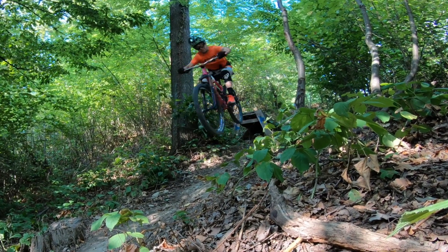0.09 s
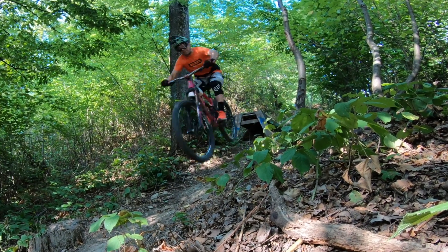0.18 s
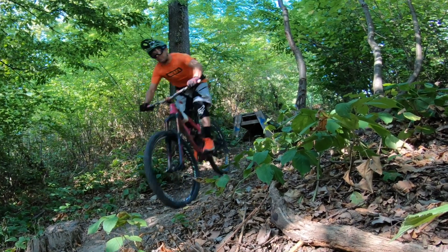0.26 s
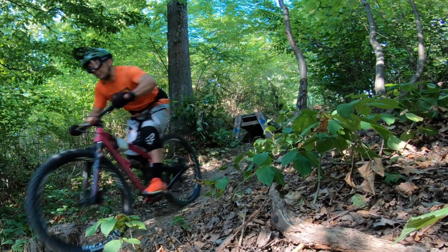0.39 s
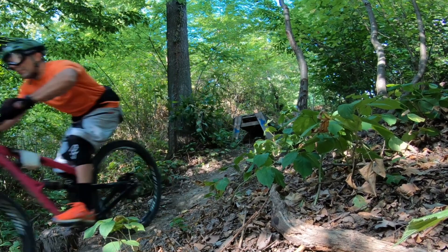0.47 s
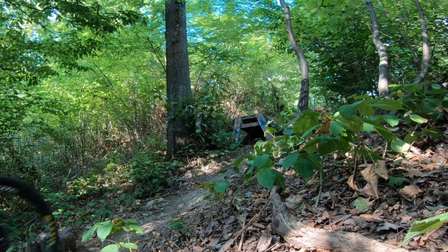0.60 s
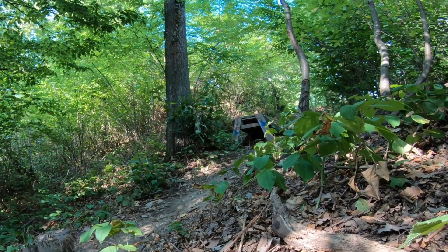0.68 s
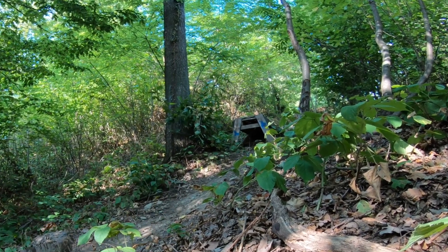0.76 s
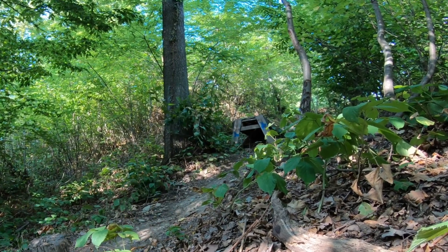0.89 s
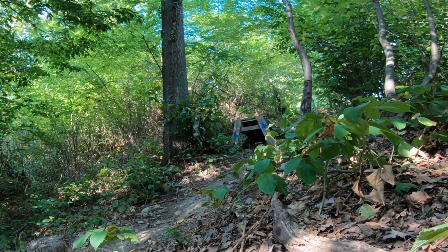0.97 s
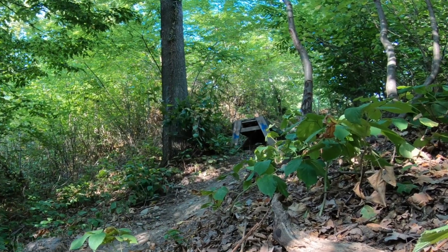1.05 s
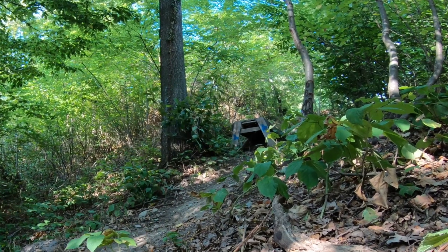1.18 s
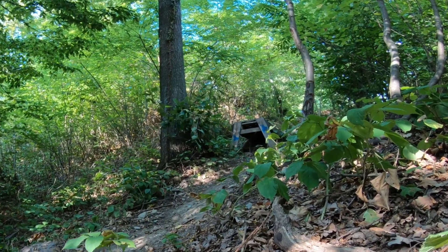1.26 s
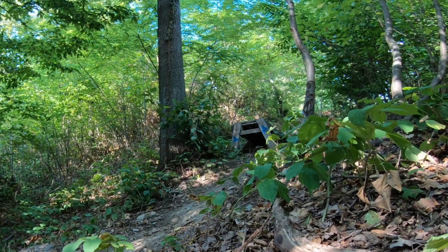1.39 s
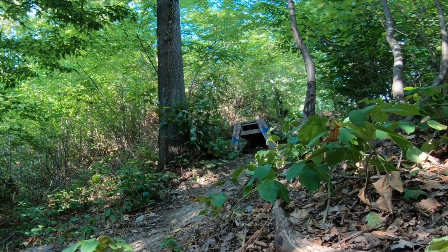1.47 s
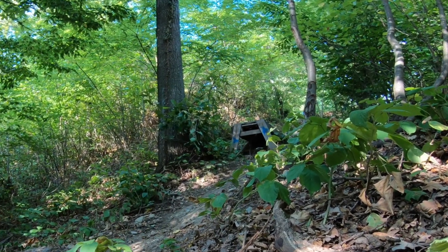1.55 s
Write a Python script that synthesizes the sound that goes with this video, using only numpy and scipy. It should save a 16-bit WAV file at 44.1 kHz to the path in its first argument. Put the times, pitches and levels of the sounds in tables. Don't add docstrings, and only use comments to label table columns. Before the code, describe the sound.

Close stereo pass of a mountain bike: brief ticking, a heavy tyre landing, dense crunches, slaps and twig knocks, then thinning tyre crackle and chain rattle leaving to the left, with short woodland echo.

```python
import sys
import numpy as np
from scipy import signal
from scipy.fft import rfft, irfft
from scipy.io import wavfile
from scipy.ndimage import uniform_filter1d

SR = 44100
rng = np.random.default_rng(int(sys.argv[2]) if len(sys.argv) > 2 else 0)


def dump_mix(stems):
    frames = np.atleast_2d(stems).T
    limited = np.clip(frames, -1, 1)
    pcm = np.round(limited * 32767).astype(np.int16)
    wavfile.write(sys.argv[1], SR, pcm)


def undo_db(level):
    steps = np.asarray(level, float) / 20
    return 10 ** steps


N = 72765
T = np.arange(N) / SR
LANDS_S = 0.212


def unit(x):
    return x / np.sqrt(np.mean(x ** 2) + 1e-30)


def colour(x, points):
    f = np.maximum(np.fft.rfftfreq(N, 1 / SR), 1)
    hz, db = np.transpose(points)
    gain = undo_db(np.interp(np.log(f), np.log(hz), db))
    return unit(irfft(rfft(x) * gain, N))


def band(x, lo_hz, hi_hz, order=2):
    edges = [lo_hz, min(hi_hz, 0.45 * SR)]
    return signal.sosfilt(signal.butter(order, edges, "band", fs=SR, output="sos"), x)


def split(x, hz):
    low = signal.filtfilt(*signal.butter(3, hz, fs=SR), x)
    return low, x - low


def ring(hz, t60, size):
    t = T[:size]
    return np.sin(2 * np.pi * hz * t) * np.exp(-np.log(1000) * t / t60)


def add(out, s, x):
    i = int(s * SR)
    out[i:i + len(x)] += x[:N - i]


def walk(rate):
    k = int(SR / rate)
    stairs = np.repeat(rng.standard_normal(N // k + 1), k)
    return 1.3 * uniform_filter1d(uniform_filter1d(stairs, k), k)[:N]


def grains(spread_db):
    grains_per_s = 6000
    on = rng.random(N) < grains_per_s / SR
    size = undo_db(spread_db * rng.exponential(size=N))
    return unit((on + 0.13) * rng.standard_normal(N) * size)


def wood():
    # (f/Hz, level/dB)
    wood_colour = [(15, -34), (25, -4), (227, 1.5), (599, -21), (5160, -16), (6750, -4), (15600, -29.5)]
    mid = colour(rng.standard_normal(N), wood_colour)
    side = band(colour(rng.standard_normal(N), wood_colour), 5300, 16000)
    return undo_db(-57) * (mid + 1.1 * side * np.array([[1], [-1]]))


def swish():
    brush_s, length_s, hz = 0.15, 0.04, 2100
    puff = np.exp(-((T - brush_s) / length_s) ** 2)
    return undo_db(-50.5) * unit(band(grains(0.5), hz / 1.37, hz * 1.45)) * puff


def freehub():
    # (f/Hz, level/dB)
    hub_colour = [(500, -18), (1200, -15.5), (2500, -7), (4500, -14.5), (6500, -12), (9000, -19),
                  (12000, -37), (15700, -40)]
    tick_hz, rise_db_per_s, peak_s = 48, 45, 0.3
    phase = (T * tick_hz + 0.051 * walk(38)) % 1
    ticks = undo_db(-48.5 + 3.5 * walk(38)) * np.exp(-phase / 0.26)
    whir = undo_db(-49.5)
    near = undo_db(rise_db_per_s * (np.minimum(T, peak_s) - 0.26)) * np.exp(-np.maximum(T - peak_s, 0) / 0.69)
    return colour(rng.standard_normal(N), hub_colour) * (ticks + whir) * near


def rattle():
    starts_s, hz, width_hz = 1.46, 2670, 520
    chatter = unit(band(grains(2.5), hz - width_hz / 2, hz + width_hz / 2))
    return chatter * undo_db(-48 + 3.7 * walk(59.86)) * np.clip((T - starts_s) / 0.016, 0, 1)


def sprays():
    # (t/s, level/dB, fade/s, low edge f/Hz, high edge f/Hz)
    shreds = [(.748, -38.5, .018, 2700, 10000), (0.845, -30.5, 0.0041, 2000, 4800),
              (.8446, -35.5, 0.0037, 7100, 10200), (.9573, -31, 0.0029, 2700, 11000),
              (.959, -34.5, 0.046, 2700, 8400), (0.41, -27, 0.0041, 5000, 8000),
              (1.55, -47.5, 0.047, 3200, 9700), (1.2, -41, .005, 1600, 4000),
              (1.161, -46.5, 0.0051, 2500, 4400), (.451, -29, 0.0036, 2200, 5700),
              (.621, -32.5, .012, 2700, 6400), (1.1, -37, 0.0038, 900, 3500), (1.2, -46, 0.021, 2900, 8300)]
    out, chance = np.zeros(N), rng.standard_normal((len(shreds), 9000))
    for (s, db, fade_s, lo_hz, hi_hz), c in zip(shreds, chance):
        hiss = unit(band(c, lo_hz, hi_hz))
        add(out, s, undo_db(db) * hiss * np.exp(-T[:len(c)] / fade_s))
    return out


def knocks():
    # (t/s, peak level/dB, top f/Hz)
    twigs = [(0.4643, -10.5, 2750), (.459, -21, 4320), (.5655, -12, 5900), (.571, -17, 2800),
             (.549, -19, 2700), (.6204, -22, 4300), (.632, -15, 2700), (0.6262, -11.5, 2520),
             (.668, -20, 3000), (0.85, -31, 1700), (.865, -22.5, 2210), (0.877, -21, 2307),
             (1.0295, -17.5, 1660), (1.082, -24, 3780), (1.1965, -24, 3260), (1.2331, -28, 2696),
             (1.295, -24, 2400), (1.3052, -17, 2350), (1.312, -22, 1450), (1.358, -28, 2002)]
    out, chance = np.zeros(N), rng.standard_normal((len(twigs), 1500))
    for (s, db, hz), c in zip(twigs, chance):
        x = 0.13 * c * np.exp(-T[:len(c)] / 0.0019)
        x[0] -= 1
        y = band(x, 362, hz, order=3)
        add(out, s, undo_db(db) * y / np.max(np.abs(y)))
    return out


def crunches():
    # (t/s, length/s, level/dB, centre f/Hz)
    bursts = [(0.211, 0.015, -27, 1830), (0.253, 0.017, -30.5, 3660), (0.284, 0.01, -27.5, 5130),
              (0.3, 0.036, -32, 2400), (0.341, 0.023, -37.5, 2100), (0.449, 0.013, -26.5, 2560),
              (0.463, 0.016, -26, 2100), (0.547, 0.019, -19, 1640), (0.615, 0.02, -24.5, 1380),
              (0.657, 0.014, -35, 1960), (0.673, 0.007, -32.5, 760), (0.707, 0.011, -35, 1190),
              (0.75, 0.02, -30, 1070), (0.784, 0.0038, -33.5, 682), (0.857, 0.02, -31.5, 1250),
              (1.024, 0.0065, -37, 899), (1.074, 0.011, -40, 2390), (1.155, 0.012, -41, 2060),
              (1.231, 0.013, -40, 930), (1.293, 0.032, -35.5, 825), (1.338, 0.036, -37, 810),
              (1.442, 0.03, -38, 843), (1.544, 0.026, -39.5, 650), (1.602, 0.028, -47, 806),
              (1.616, 0.017, -60, 2420)]
    rise_share, tail_s = 0.28, 0.0062
    octaves_below, octaves_above = 1.74, 0.79
    out, g, t = np.zeros(N), grains(1), T[:6000]
    for s, length, db, hz in bursts:
        rise = np.clip(t / (rise_share * length), 0, 1)
        shape = rise * np.exp(-np.maximum(t - length, 0) / tail_s)
        x = np.resize(g[int(s * SR):], len(t)) * shape
        y = unit(band(x, hz / 2 ** octaves_below, hz * 2 ** octaves_above))
        y = y + undo_db(-18.5) * unit(band(x, 4050, 6550))
        y = y + undo_db(-6.5) * unit(band(x, 238, 746))
        add(out, s, undo_db(db) * y * np.sqrt(np.mean(shape ** 2)))
    return out


def slaps():
    # (t/s, peak level/dB, ring f/Hz, ring t60/s, crack level/dB)
    strikes = [(.226, -9, 2895, 0.013, -19), (0.4102, -9, 2860, 0.018, -17), (.474, -16.5, 2270, 0.016, -3),
               (.499, -10, 2830, 0.017, -15), (0.529, -20, 400, 0.093, -38), (.385, -30.5, 400, 0.34, -42),
               (.214, -26.5, 785, 0.057, -30), (.285, -30, 935, 0.061, -30), (1.513, -38, 1250, 0.046, -40),
               (1.624, -30, 2600, .04, -37), (1.557, -28.5, 470, 0.032, -40), (0.554, -8, 1388, 0.04, -39),
               (.561, -9.5, 2100, 0.029, -39), (0.75, -21.5, 2600, 0.028, -7),
               (.8448, -19, 3250, 0.011, -11), (.9575, -14.5, 3250, 0.01, -10.5),
               (.978, -26.5, 1970, 0.15, -32), (.562, -20.5, 462, 0.068, -40), (.578, -26.5, 400, 0.3, -40),
               (1.612, -28, 607, 0.084, -34), (.352, -30, 1927, 0.4, -28), (0.598, -29, 2700, 0.36, -20),
               (1.164, -28.5, 2120, .03, -38), (1.605, -30, 1280, 0.088, -30),
               (1.46, -24, 2900, 0.026, -34), (1.513, -29.5, 2650, 0.035, -37),
               (1.552, -27.5, 2650, 0.04, -34), (1.602, -29.5, 2800, 0.056, -26)]
    spread, roughness = 0.069, 0.5
    out, chance = np.zeros(N), rng.standard_normal((len(strikes), 5000))
    for (s, db, hz, t60, crack_db), c in zip(strikes, chance):
        modes = ring(hz, t60, size=5000)
        for side, d in zip((1, -1), c):
            detune = side * spread * (1 + 0.286 * np.tanh(d))
            modes = modes + 0.52 * side * ring(hz * (1 + detune), t60, size=5000)
        rough = 1 + roughness * unit(uniform_filter1d(c[::-1], size=30))
        rise = np.clip(T[:5000] / 0.00058, 0, 1)
        crack = band(c * np.exp(-T[:5000] / 0.0028), 1700, 13000)
        add(out, s, undo_db(db) * (0.57 * modes * rough * rise + undo_db(crack_db) * crack))
    return out


def ride(axis):
    # (t/s, tyre contact level/dB, load on the tyre walls level/dB)
    path = np.array([(.2, -41, -30), (.23, -33, -27), (.33, -33, -29.5), (.42, -31.5, -37.5),
                     (.6, -36.5, -33), (.7, -40.5, -35.5), (.78, -38, -28), (.83, -39, -42.5),
                     (.91, -41.5, -34.5), (.99, -35, -39.5), (1.119, -43, -44), (1.27, -46, -36),
                     (1.38, -42, -41.5), (1.5, -45, -46.5), (1.65, -43, -55)])
    return np.interp(T, path[:, 0], path[:, axis])


def rolling():
    # (f/Hz, level/dB)
    dirt_colour = [(88, -16), (150, 1), (428, -5), (1220, -12), (1950, -6), (4070, -15), (7160, -19),
                   (9950, -22.5), (15600, -74)]
    down = np.clip((T - LANDS_S) / 0.015, 0, 1)
    return colour(grains(0.5), dirt_colour) * undo_db(ride(axis=1) + 1.07 * walk(29.37)) * down


def cavity():
    # (t/s, pitch f/Hz, level/dB)
    hum = np.array([(0.21, 232.7, -49), (0.242, 233.7, -35), (0.314, 232.3, -28.5), (0.362, 227.2, -54),
                    (0.402, 227.5, -32.5), (0.43, 222.3, -45.5), (0.518, 238.6, -34.5), (0.566, 222.7, -39),
                    (0.71, 225.1, -51), (0.77, 223.8, -38.5), (1.184, 241.1, -47), (1.224, 229.7, -46),
                    (1.272, 230.3, -36), (1.38, 229.4, -52.5), (1.408, 228.6, -42.5), (1.488, 243.5, -52.5),
                    (1.544, 220.6, -49), (1.65, 221, -44)])
    hz = np.interp(T, hum[:, 0], hum[:, 1]) * (1 + 0.015 * walk(18.1))
    db = -1.5 + np.interp(T, hum[:, 0], hum[:, 2]) + 2.86 * walk(22.1)
    return np.sqrt(2) * undo_db(db) * np.sin(2 * np.pi * np.cumsum(hz) / SR)


def carcass():
    # (t/s, peak level/dB, pitch f/Hz, t60/s)
    bumps = [(0.2219, -12.5, 46.2, 0.2), (0.262, -20.5, 90.5, 0.1), (.281, -20, 56, 0.13),
             (.3, -16.5, 114, 0.097), (0.384, -24.5, 96.4, 0.18), (0.479, -19.5, 90, 0.1),
             (0.534, -25.5, 40.2, .15), (0.576, -23, 124.3, 0.26), (.68, -24.5, 45.3, 0.63),
             (0.746, -25, 50.9, 0.19), (0.79, -24.5, 88.2, 0.12), (0.871, -23.5, 48, .2),
             (.891, -21.5, 105, 0.097), (0.998, -31, 100, 0.16), (1.01, -35, 50, .15),
             (1.091, -29, 62.6, 0.13), (1.247, -43, 95, 0.083), (0.795, -22, 151, .03),
             (1.35, -29.5, 172, 0.14), (1.545, -31, 180, 0.079)]
    rim_hz, push_s = 397, 0.0047
    down = np.clip((T - LANDS_S) / 0.0067, 0, 1)
    rumble = undo_db(-2) * unit(band(rng.standard_normal(N), 33, 105, order=1))
    rim = undo_db(-19) * unit(band(rng.standard_normal(N), rim_hz - 14, rim_hz + 14, order=1))
    out = ((rumble + rim) * undo_db(ride(axis=2)) + cavity()) * down
    push = 1 - np.exp(-T[:16000] / push_s)
    for s, db, hz, t60 in bumps:
        add(out, s, push * undo_db(db) * ring(hz, t60, size=16000))
    return out


def leaf_echo(hits):
    t60_s, t = 0.21, T[:12000]
    tail = rng.standard_normal(12000) * np.exp(-np.log(1000) * t / t60_s) * (t > 0.004)
    tail = tail / np.linalg.norm(tail)
    return undo_db(-11.5) * signal.fftconvolve(band(hits, 750, 13000, order=1), tail)[:N]


def bearing():
    from_db, to_db, turns_s, turn_length_s = -2, 8, 0.61, 0.12
    return from_db + (to_db - from_db) * (1 + np.tanh((T - turns_s) / turn_length_s)) / 2


def ports(x):
    pan_db = bearing()
    low, rest = split(x, 504)
    mid, high = split(rest, 5240)
    apart = high
    for lag in (7, 19, 31):
        tap = np.zeros(lag + 1)
        tap[0], tap[-1] = 1, 0.5
        apart = signal.lfilter(tap[::-1], tap, apart)
    side = -0.095 * low + np.tanh(pan_db * np.log(10) / 40) * mid
    side = side + 0.2242 * pan_db * np.gradient(mid + low)
    side = side + (-0.24 + 0.023 * pan_db) * high
    side = side + apart * np.tanh(2 * walk(120))
    return np.array([x + side, x - side])


def scene():
    # (f/Hz, level/dB)
    hit_air = [(6000, 1), (9000, -3), (11000, -13), (15700, -28)]
    hits = crunches() + slaps() + knocks()
    hits = colour(hits, hit_air) * np.std(hits)
    bike = hits + rolling() + carcass() + freehub() + swish() + sprays() + rattle()
    return ports(bike + leaf_echo(hits)) + wood()


def low_pass(x):
    return signal.sosfilt(signal.butter(12, 15400, fs=SR, output="sos"), x)


def record(dry):
    mix = signal.sosfilt(signal.butter(8, 14600, fs=SR, output="sos"), dry)
    return low_pass(mix)


dry = scene()
out = record(dry)
dump_mix(out)
```